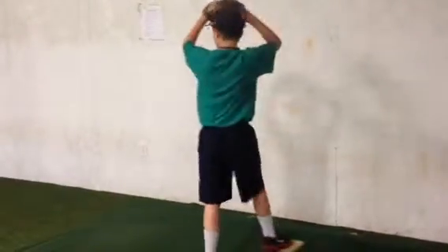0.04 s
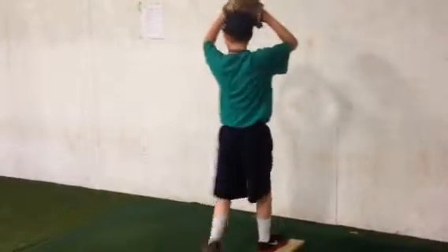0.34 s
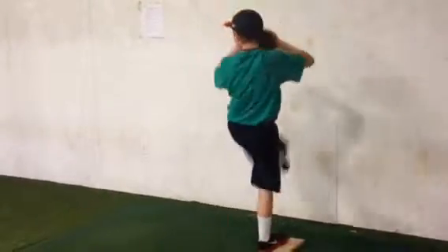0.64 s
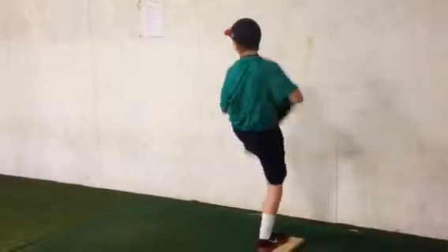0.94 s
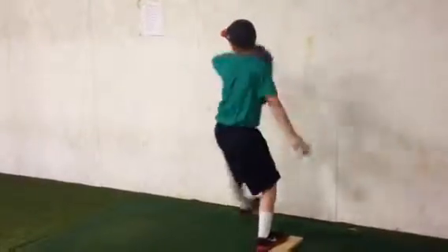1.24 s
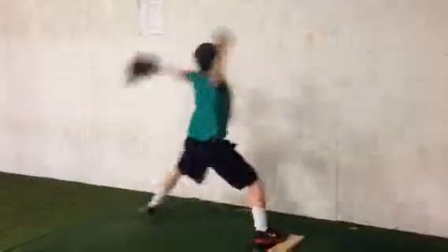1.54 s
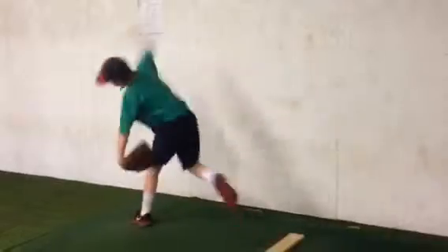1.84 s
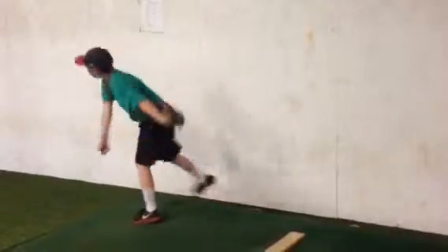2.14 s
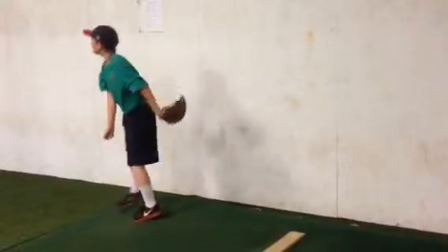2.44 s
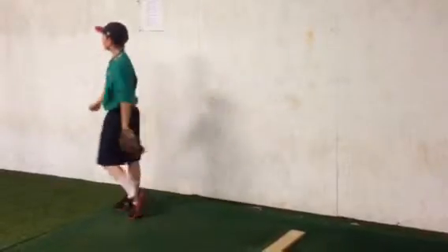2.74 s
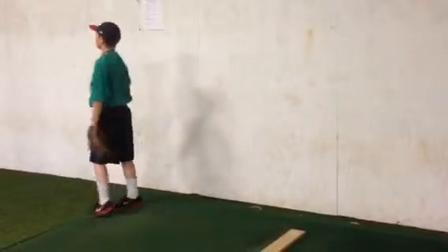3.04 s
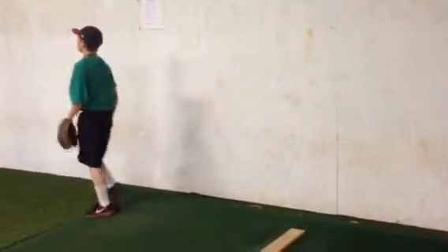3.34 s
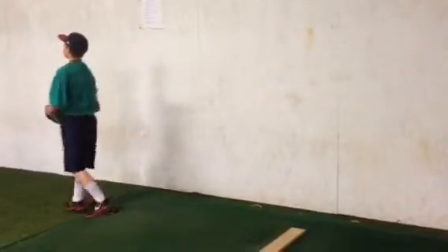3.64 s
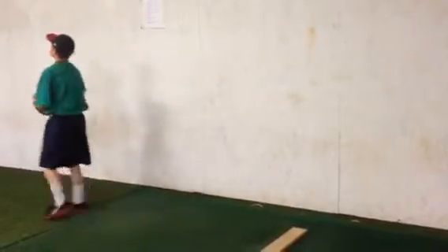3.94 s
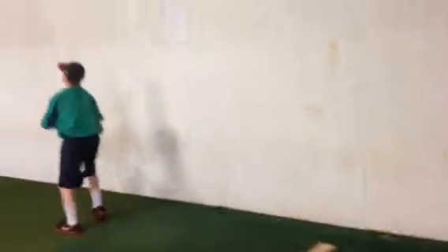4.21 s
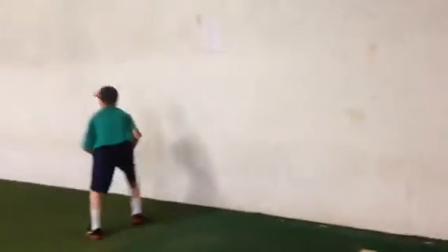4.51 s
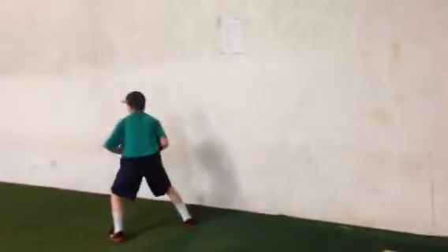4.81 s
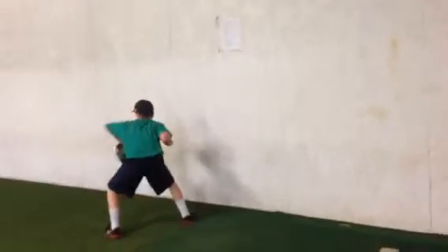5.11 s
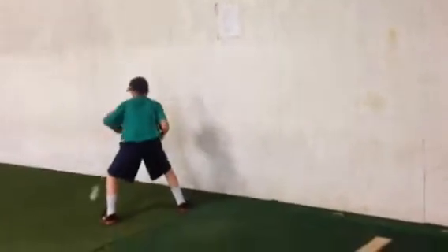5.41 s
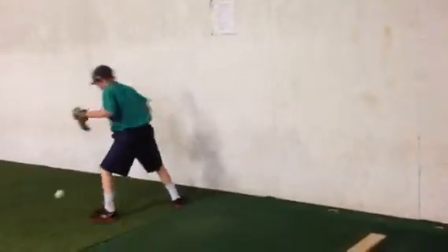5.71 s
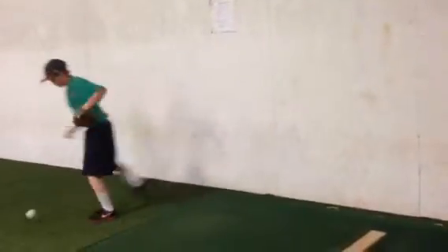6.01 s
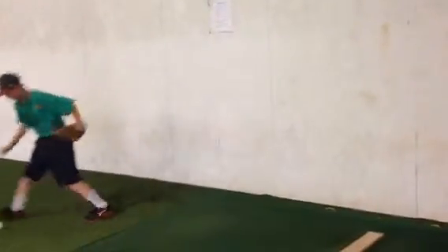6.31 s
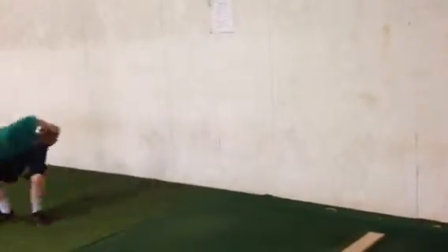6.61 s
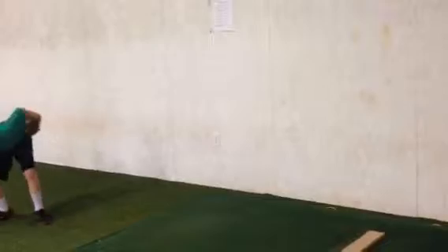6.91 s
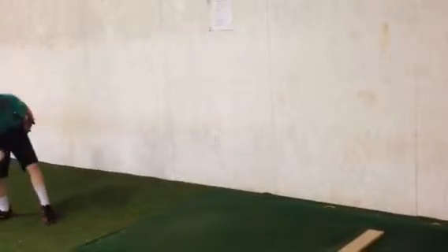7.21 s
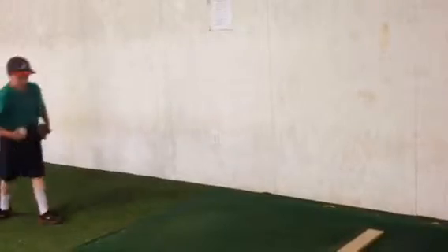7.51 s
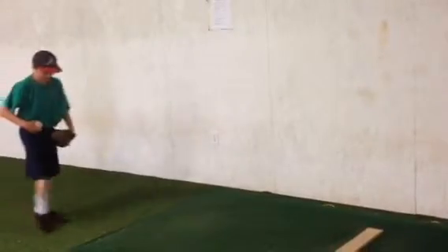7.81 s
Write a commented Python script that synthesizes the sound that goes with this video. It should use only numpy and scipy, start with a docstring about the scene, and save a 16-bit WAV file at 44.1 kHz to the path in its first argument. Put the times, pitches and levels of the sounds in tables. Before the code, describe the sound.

A pitched baseball cracks and booms against a backstop in an echoing hall, then bounces and slaps a leather glove amid scuffing footsteps.

```python
"""A large, echoing indoor hall with artificial turf, where a boy pitches a baseball.
The impact excites the backstop's modes in a crack and a boom, and a gritty clack follows. The ball is
tossed back, bounces, slaps his glove, drops and rolls off; knocks sound at the wall as it is picked up.
His shoes clop, thump and drag, their friction flicking the turf blades. Each blow is a brief force
filtered by a body and prolonged by the hall's reverberation, over a faint ventilation hum."""
import sys
import numpy as np
from scipy import signal
from scipy.fft import rfft, irfft
from scipy.io import wavfile
from scipy.ndimage import uniform_filter1d

SR = 44100
rng = np.random.default_rng(int(sys.argv[2]) if len(sys.argv) > 2 else 0)


def put_to_file(sound):
    """Save the sound as 16-bit audio at rate SR, in the file named by the first command-line argument."""
    columns = np.atleast_2d(sound).T  # one column per channel
    safe = np.clip(columns, -1, 1)
    whole_steps = np.round(safe * 32767)
    wavfile.write(sys.argv[1], SR, whole_steps.astype(np.int16))


N = 350595
TAPS = 8192
BINS = np.fft.rfftfreq(TAPS, 1 / SR)


# The pitch, then the backstop's rattle. Each row: start in seconds, level in dB, crack's echo gain in dB.
BACKSTOP_STRIKES = [(2.7448, -1, 3), (2.7588, -19.5, -12), (2.856, -13, -14), (2.887, -18, -7)]
# The crack's broad spectrum. Each row: frequency in Hz, gain in dB.
CRACK_SPECTRUM = [(40, -56), (90, -7.5), (200, 19), (420, -2), (800, 12.5), (1400, 6), (2300, 5.5),
                  (3100, 2), (3700, -3.5), (5200, -5), (9000, -6.5), (15000, -17.5)]
# Modes of the crack and of the booming panel. Each row: frequency in Hz, bandwidth in Hz, gain in dB.
CRACK_MODES = [(650, 140, 26), (994, 92, 18), (1896, 95, 14.3), (2560, 170, 16.3), (3030, 98, 16.3),
               (4020, 230, 6.5), (4900, 130, 12.7)]
PANEL_MODES = [(164, 31, 21), (242, 45, 29), (303.5, 80, 27), (405, 113, 23.5), (601, 100, 21.5),
               (667, 93, 22.5), (903, 145, 23), (950, 50, 25), (1020, 36, 21.5), (1082, 150, 20.5)]

def backstop(boom_db=-1.5, boom_db_per_db=0.7):
    """Impact excitation: the pitch cracks at the far end, and the shaken panel booms into the hall."""
    out = np.zeros(N)
    broad, peaks = amp(read(CRACK_SPECTRUM, BINS)), resonances(CRACK_MODES)
    for s, db, room_db in BACKSTOP_STRIKES:
        force = contact(0.0068)
        add(out, s, reflected(ring(force, amp(db) * np.hypot(broad, peaks))))
        # the hall gathers sound from all directions, which evens out the sharp peaks
        add(out, s, hall(ring(force, amp(db + room_db) * broad), distance=0.95))
        boom = ring(force, amp(boom_db + boom_db_per_db * db) * resonances(PANEL_MODES))
        add(out, s, hall(boom, distance=0.45))
    add(out, 2.905, thud(db=14, contact_s=0.029, pitch=1.23, room_db=-7.5))  # the backstop swings back
    return out


# Modes of the hard clack. Each row: frequency in Hz, bandwidth in Hz, gain in dB.
CLACK_MODES = [(818, 93, -9), (1430, 89, 8.5), (3320, 180, -6), (3800, 170, -4.5), (4300, 280, -4)]

def rebound(skid_s=3.5695, clack_s=3.583):
    """Friction and impact: a far skid, thud and clack, probably the ball landing behind the backstop."""
    out = np.zeros(N)
    add(out, skid_s, amp(-43) * scuff(rise_s=0.0022, fall_s=0.041, centre_hz=1570, hiss_db=-12))
    skid_echo = amp(-3.5) * hall(out, distance=0.5)[:N]
    add(out, skid_s, thud(db=0, contact_s=0.0215, pitch=0.93, room_db=7))
    clack = ring(contact(0.0076), amp(-0.5) * resonances(CLACK_MODES))
    add(out, clack_s, reflected(clack))
    return out + skid_echo


# The ball meets the glove. Each row: start in seconds, level in dB.
GLOVE_SLAPS = [(1.071, -30), (4.727, -7), (5.0939, 0.9), (5.1773, -11.5)]
# The leather's broad spectrum. Each row: frequency in Hz, gain in dB.
LEATHER_SPECTRUM = [(50, -18), (200, -5), (450, -15), (1000, -3), (2200, -7.5), (3400, -13.5),
                    (5000, -15.5), (8000, -12.5), (15000, -19)]
# The glove's modes. Each row: frequency in Hz, bandwidth in Hz, gain in dB.
GLOVE_MODES = [(342, 86, 5.5), (556, 140, 1), (780, 184, 6.5), (1280, 170, -6.5), (1700, 300, -1),
               (2400, 140, -10), (3500, 270, -7.5), (7710, 900, -12)]

def glove():
    """Damped resonance: the ball slaps the leather and the pocket pops."""
    out = np.zeros(N)
    skin = amp(read(LEATHER_SPECTRUM, BINS) - 1)
    body = np.hypot(skin, resonances(GLOVE_MODES)) * tilt(-2, pivot_hz=2040)
    for s, db in GLOVE_SLAPS:
        slap = ring(contact(0.00943), amp(db) * body)
        add(out, s, in_hall(slap, room_db=-2.5, distance=0.82))
    return out


# The ball bounces. Each row: start in seconds, level in dB, frequency ratio.
BALL_BOUNCES = [(4.7145, 12, 1.22), (4.724, 16, 0.97), (5.108, 7, 1.21), (5.532, 6, 0.93),
                (5.955, -5, 0.75)]
# Heels land. Each row: start in seconds, level in dB.
HEEL_STRIKES = [(1.645, 0), (1.677, -6.5), (1.922, -6.5), (2.528, -5), (4.387, -8.5), (5.554, -3.5)]

def turf_impacts():
    """Contact time: the ball leaves the turf briskly; heels sink in for longer and mostly sound lower."""
    out = np.zeros(N)
    for s, db, pitch in BALL_BOUNCES:
        add(out, s, thud(db, contact_s=0.005, pitch=pitch, room_db=2.5))
    for s, db in HEEL_STRIKES:
        add(out, s, thud(db, contact_s=0.0132, pitch=0.77, room_db=1))
    return out


# A cushioned blow at a frequency ratio of one. Each row: frequency in Hz, gain in dB.
THUD_SPECTRUM = [(40, -32), (95, -38.5), (150, -1.5), (220, 1.5), (340, -3), (450, -8), (620, -11.5),
                 (900, -26.5), (1500, -30.5), (3000, -42), (12000, -68)]

def thud(db, contact_s, pitch, room_db):
    """Cushioning: a yielding surface passes mainly the low frequencies of a blow into the hall."""
    blow = ring(contact(contact_s), amp(db + read(THUD_SPECTRUM, BINS / pitch)))
    return in_hall(blow, room_db, distance=0.69)


# A shoe lands, heel then toe. Each row: start in seconds, level in dB, tilt in dB per octave.
SHOE_CLOPS = [(.376, -18.5, -3), (.3818, -11.5, -2.5), (.428, -17.5, 5)]
# The sole's modes. Each row: frequency in Hz, bandwidth in Hz, gain in dB.
SOLE_MODES = [(380, 140, -3.5), (720, 180, 4), (1380, 560, 0), (1860, 180, 5.5), (2180, 300, 2.5),
              (3080, 810, -15)]

def pitching_rubber():
    """Heavy damping: a stiff sole knocks on the rubber, and its broad modes die at once."""
    out = np.zeros(N)
    for s, db, tilt_db in SHOE_CLOPS:
        clop = ring(contact(0.017), amp(db) * resonances(SOLE_MODES) * tilt(tilt_db, pivot_hz=1370))
        add(out, s, in_hall(clop, room_db=-7, distance=0.49))
    return out


# Knocks as the ball is picked up. Each row: start in seconds, level in dB.
WALL_KNOCKS = [(7.3115, -1.5), (7.334, 2), (7.378, -7.5), (7.548, -4)]
# The wall's modes. Each row: frequency in Hz, bandwidth in Hz, gain in dB.
WALL_MODES = [(105, 40, -18), (154, 25, 12), (179, 43, 7), (260, 103, -0.5), (348, 250, -11)]

def side_wall():
    """Modal vibration: the wall's low modes give each knock a hollow sound."""
    out = np.zeros(N)
    for s, db in WALL_KNOCKS:
        knock = ring(contact(0.0046), amp(db) * resonances(WALL_MODES))
        add(out, s, in_hall(knock, room_db=-2, distance=0.21))
    return out


# Small sharp ticks. Each row: start in seconds, level in dB, tilt in dB per octave.
NEAR_TICKS = [(4.295, -39, 12), (4.433, -35, 5), (4.7537, -24, 23), (4.7565, -7.5, 9.5), (5.218, -24, -2),
              (5.536, -28, -7)]
# Their bright spectrum. Each row: frequency in Hz, gain in dB.
TICK_SPECTRUM = [(100, -42), (2500, -16), (4500, -1.5), (5800, -2.5), (7800, -2), (9200, -15),
                 (12000, -7.5), (15000, -20)]

def ticks(room_db=-13):
    """Direct field: tiny hard contacts close by sound bright and nearly dry."""
    out = np.zeros(N)
    for s, db, tilt_db in NEAR_TICKS:
        colour = amp(db + read(TICK_SPECTRUM, BINS)) * tilt(tilt_db, pivot_hz=6700)
        add(out, s, ring(contact(0.0026), colour))
    return out + amp(room_db) * hall(out)[:N]


# Soles bite and skid to rest (landings) or swell and fade (drags).
# Each row: start in seconds, level in dB, sliding time in seconds, blade hiss gain in dB.
SOLE_LANDINGS = [(1.647, -57.5, .06, -13), (1.704, -54.5, .006, -9), (1.868, -62.5, .032, 0),
                 (2.297, -58.5, 0.042, -6), (2.532, -58.5, 0.078, -28), (3.615, -52.5, 0.18, -22),
                 (4.036, -63, 0.12, -16), (4.156, -61.5, 0.062, -10.5), (4.313, -53, .008, -11),
                 (4.35, -57, 0.061, -13), (4.455, -53.5, 0.011, -12.5), (4.906, -61, 0.019, -1)]
SOLE_DRAGS = [(.241, -65.5, 0.25, -11), (1.379, -68.5, 0.13, 1), (1.715, -53.5, 0.058, -2),
              (1.956, -61.5, 0.08, -18), (2.598, -66.5, 0.22, -25), (4.222, -65, 0.13, -15),
              (4.516, -54.5, 0.048, -13.5), (4.631, -68.5, .125, 2), (5.936, -63, 0.058, -9),
              (6.311, -61, 0.16, -4), (6.408, -59.5, .06, -20), (6.578, -60, 0.085, -9.5),
              (7.204, -68, 0.033, 0), (7.428, -69.5, 0.22, -23), (7.853, -62.5, 0.091, -11.5)]

def shoes(bite_s=0.0015, swell_share=0.25, leaves_mound_s=3.3, room_db=-4):
    """Sliding friction: soles rub on the mound's short pile, then at a lower pitch on the field."""
    out = np.zeros(N)
    strokes = [(s, db, bite_s, skid_s, hiss_db) for s, db, skid_s, hiss_db in SOLE_LANDINGS]
    for s, db, length_s, hiss_db in SOLE_DRAGS:
        strokes.append((s, db, swell_share * length_s, (1 - swell_share) * length_s, hiss_db))
    for s, db, rise_s, fall_s, hiss_db in strokes:
        rub_hz = 2010 if s < leaves_mound_s else 1480
        add(out, s, amp(db) * scuff(rise_s, fall_s, rub_hz, hiss_db))
    return out + amp(room_db) * hall(out, distance=0.53)[:N]


# The rub, centred on 1500 Hz, and the blades' hiss. Each row: frequency in Hz, gain in dB.
RUB_SPECTRUM = [(100, -23), (450, -1), (900, 1.5), (1500, 1), (2300, -3), (3300, -9), (5000, -17),
                (15000, -32)]
HISS_SPECTRUM = [(500, -17), (2500, -8), (4000, 1.5), (5800, -8), (8000, -3.5), (12000, -6), (15000, -8)]

def scuff(rise_s, fall_s, centre_hz, hiss_db, grain_db=1.2, grains_per_s=7000, catch_db=1.2):
    """Stick-slip friction: turf blades flick in dense grains that surge as the slider catches and slips."""
    t = np.arange(SR // 2) / SR
    size = amp(grain_db * np.minimum(rng.exponential(1, len(t)), 4))
    catches = amp(catch_db * unit(uniform_filter1d(rng.standard_normal(len(t)), size=300)))
    signs = rng.choice([-1, 1], len(t))
    flicks = size * catches * signs * (rng.random(len(t)) < grains_per_s / SR)
    rub = amp(read(RUB_SPECTRUM, BINS * 1500 / centre_hz))
    hiss = amp(hiss_db + read(HISS_SPECTRUM, BINS))
    stroke = np.minimum(t / rise_s, 1) * np.exp(-(np.maximum(t - rise_s, 0) / fall_s) ** 3.3)
    return stroke * unit(ring(flicks, np.hypot(rub, hiss))[:len(t)])


# The first echoes. Each row: delay in seconds, amplitude ratio.
EARLY_REFLECTIONS = [(0.0157, 0.36), (0.0226, 0.062), (.032, .18), (0.045, 0.13)]

def reflected(x, absorb_hz=3500):
    """Early reflection: the direct sound is followed by copies dulled by turf and netting."""
    out = np.concatenate([x, np.zeros(SR // 10)])
    dull = signal.lfilter(*signal.butter(1, absorb_hz, fs=SR), x)
    for delay_s, gain in EARLY_REFLECTIONS:
        add(out, delay_s, gain * dull)
    return out


# The hall's decay. Each row: frequency in Hz, time to fall 60 dB in seconds.
HALL_T60 = [(100, 1.18), (250, 2.05), (1000, 1.745), (2600, 1.79), (4400, 1.43), (7000, 0.85),
            (12000, 0.48)]
# Its build-up at a distance factor of one. Each row: frequency in Hz, time constant in seconds.
HALL_BUILD_UP = [(200, 0.075), (500, 0.059), (1000, 0.0053), (2000, 0.0043), (8000, 0.001)]

def hall(x, distance=0.94, patchy_db=1.5):
    """Diffuse reverberation: it builds more slowly for bass and far sources, and the treble dies first."""
    hz, t, noise = signal.stft(rng.standard_normal(3 * SR // 2), SR, nperseg=512)
    clumps = uniform_filter1d(rng.standard_normal(noise.shape), size=12, axis=0)  # across frequency
    clumps = unit(uniform_filter1d(clumps, size=4, axis=1))  # and across time
    fill = 1 - np.exp(-(t + 0.022) / (distance * read(HALL_BUILD_UP, hz)[:, None]))
    level_db = patchy_db * clumps - 60 * t / read(HALL_T60, hz)[:, None]
    tail = signal.istft(noise * fill * amp(level_db), SR, nperseg=512)[1]
    onset = np.minimum(np.arange(len(tail)) / SR / 0.0025, 1)
    return signal.oaconvolve(x, tail * onset * np.sqrt(10 / SR))


def in_hall(x, room_db, distance):
    """Room response: direct sound, early reflections, then the diffuse field."""
    out = amp(room_db) * hall(x, distance)
    add(out, 0, reflected(x))
    return out


# Moving air. Each row: frequency in Hz, relative spectral density in dB.
AIR_SPECTRUM = [(18, -74), (30, -21), (55, -21), (100, -8), (150, -1), (229, 0), (314, -8.5), (367, -5),
                (429, -12), (476, -12.5), (669, -12), (723, -14.5), (868, -14.5), (939, -14), (1320, -15),
                (2340, -18), (3040, -20), (6000, -24.5), (10000, -27), (15300, -26)]
# Fan tones. Each row: frequency in Hz, level in dB.
FAN_TONES = [(141, -81), (240, -96), (362, -81), (722, -84.5), (960, -84.5)]

def ventilation(air_db=-66.5, waver_hz=1.49):
    """Fan noise: steady broadband airflow with a few faint, wavering tones."""
    colour = amp(read(AIR_SPECTRUM, np.fft.rfftfreq(N, 1 / SR)))
    out = amp(air_db) * unit(irfft(rfft(rng.standard_normal(N)) * colour, N))
    for hz, db in FAN_TONES:
        drift = waver_hz * unit(uniform_filter1d(rng.standard_normal(N), SR // 5))
        out += amp(db) * unit(np.sin(2 * np.pi * np.cumsum(hz + drift) / SR))
    return out


def contact(length_s, snap=1.8):
    """Broadband excitation: a snap, then a short rough crush, with unit energy in all."""
    t = np.arange(TAPS) / SR
    window = np.exp(-(t / length_s) ** 4)
    force = window * rng.standard_normal(TAPS)
    force[0] += snap
    for _ in range(6):  # flatten the spectrum while keeping the force brief
        force = window * irfft(np.exp(1j * np.angle(rfft(force))))
    return force / np.linalg.norm(force)


def ring(x, gain):
    """Convolution: x drives a causal, minimum-phase body with this gain at each frequency."""
    log_gain = np.log(np.maximum(gain, 1e-5))
    mirrored = np.concatenate([log_gain, log_gain[-2:0:-1]])
    response = np.exp(np.conj(signal.hilbert(mirrored)))
    return signal.fftconvolve(x, np.fft.ifft(response).real[:TAPS // 2])


def resonances(modes):
    """Resonance: the gain of a body whose modal peaks add in power."""
    peaks = (amp(db) / (1 + (2 * (BINS - hz) / width) ** 2) for hz, width, db in modes)
    return np.sqrt(sum(peak ** 2 for peak in peaks))


def tilt(db_per_octave, pivot_hz):
    """Spectral slope: a gain that brightens or dulls about a pivot."""
    return amp(db_per_octave * np.log2(np.maximum(BINS / pivot_hz, 1 / 4)))


def read(points, hz):
    """Interpolation along a log-frequency axis."""
    table_hz, value = np.transpose(points)
    return np.interp(np.log(hz + 1), np.log(table_hz + 1), value)


def amp(db):
    """Amplitude ratio of a level in decibels."""
    return 10 ** (np.asarray(db) / 20)


def unit(x):
    """Normalisation to an rms of one."""
    return x / np.sqrt(np.mean(x ** 2) + 1e-20)


def add(mix, s, sound):
    """Superposition of a sound starting at s seconds."""
    part = mix[round(s * SR):][:len(sound)]
    part += sound[:len(part)]


def scene():
    """Superposition: the pressures of all sources add at one point."""
    impacts = backstop() + rebound() + turf_impacts() + glove() + pitching_rubber() + side_wall() + ticks()
    return (impacts + shoes() + ventilation())[None]


def record(dry, low_cut_hz=55, high_cut_hz=15450):
    """Band limiting: a small microphone loses the deepest bass, and a low-pass cuts the top treble."""
    thin = signal.sosfilt(signal.butter(2, low_cut_hz, "highpass", fs=SR, output="sos"), dry)
    low_pass = signal.firwin(511, high_cut_hz, window=("kaiser", 8), fs=SR)
    return signal.oaconvolve(thin, low_pass[None], "same")


dry = scene()
out = record(dry)
put_to_file(out)
```